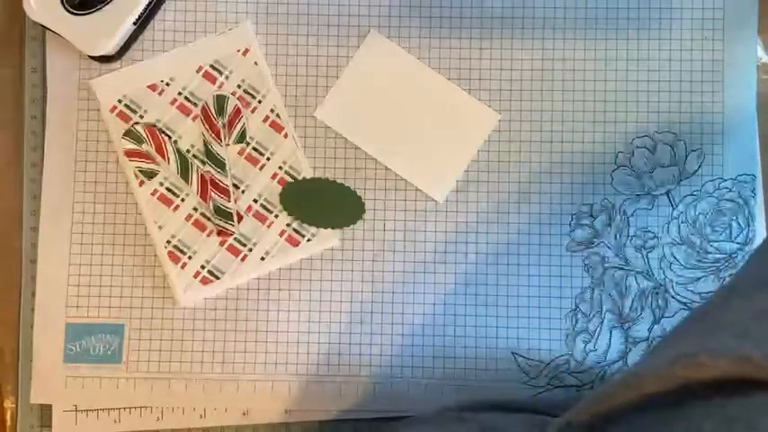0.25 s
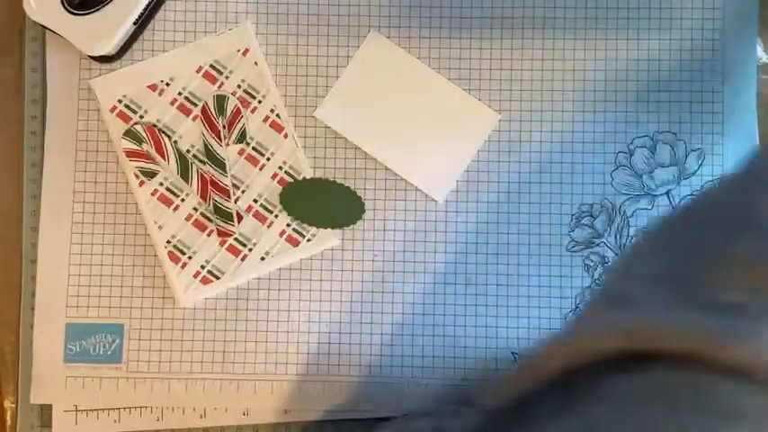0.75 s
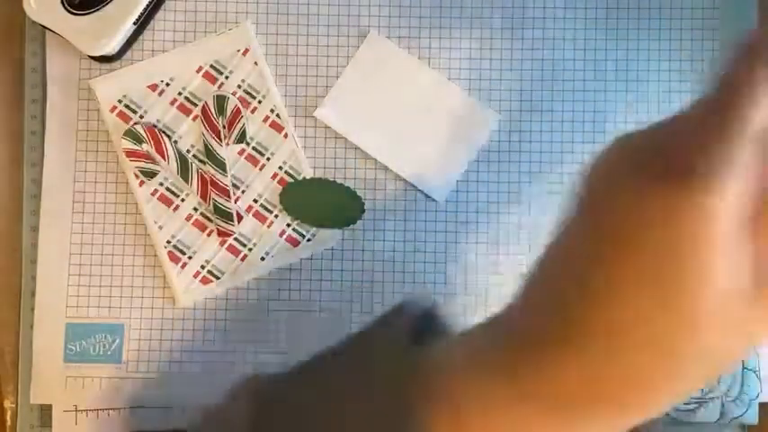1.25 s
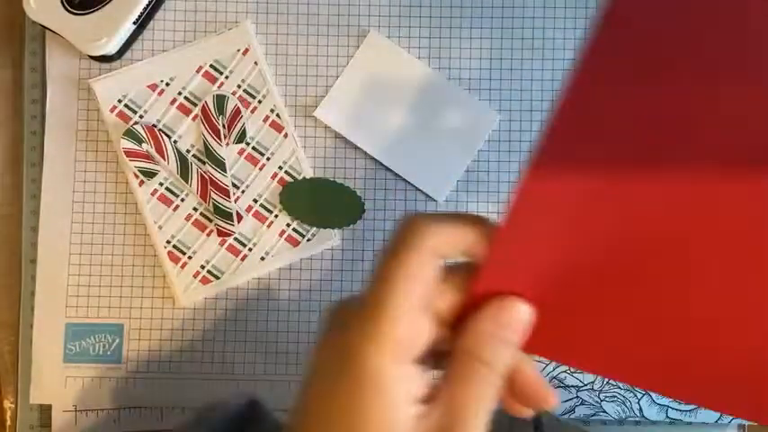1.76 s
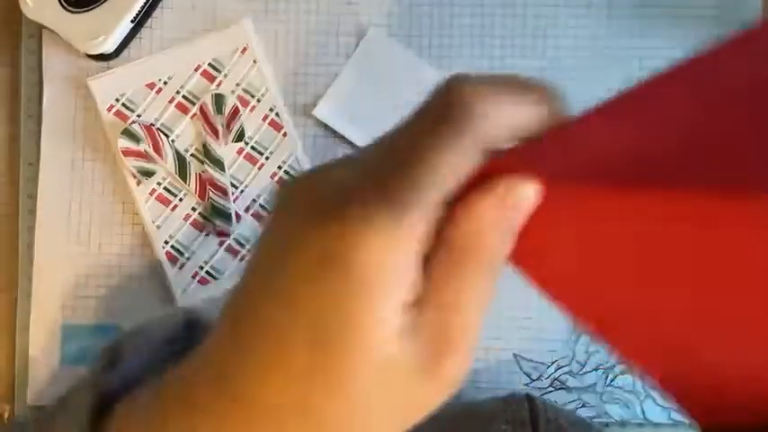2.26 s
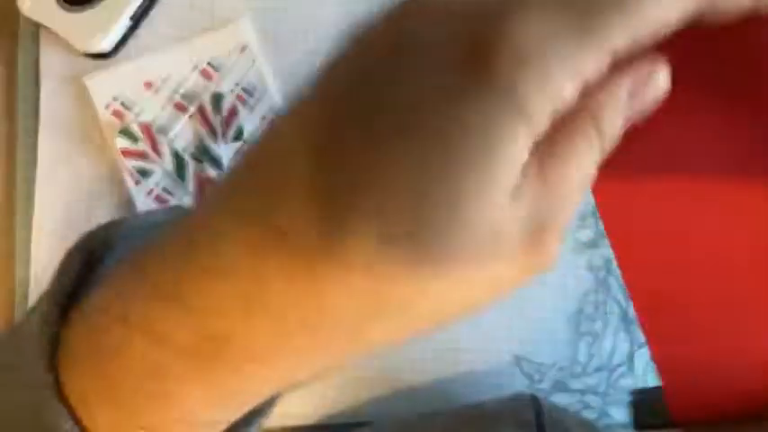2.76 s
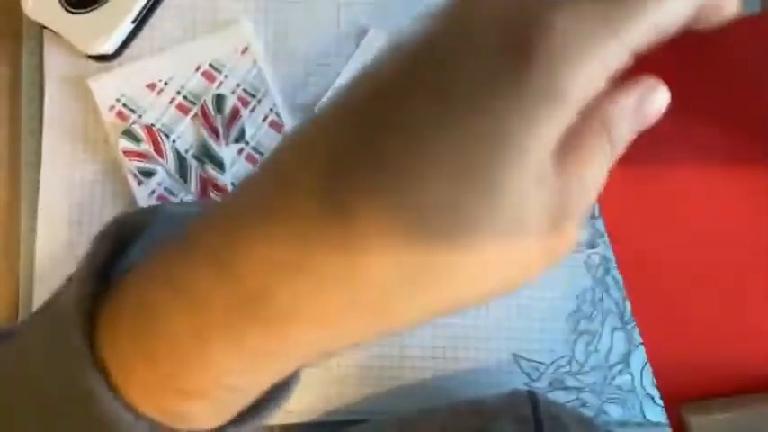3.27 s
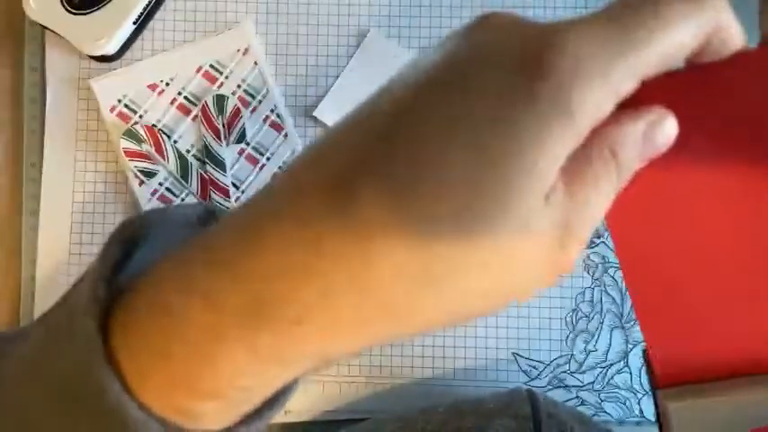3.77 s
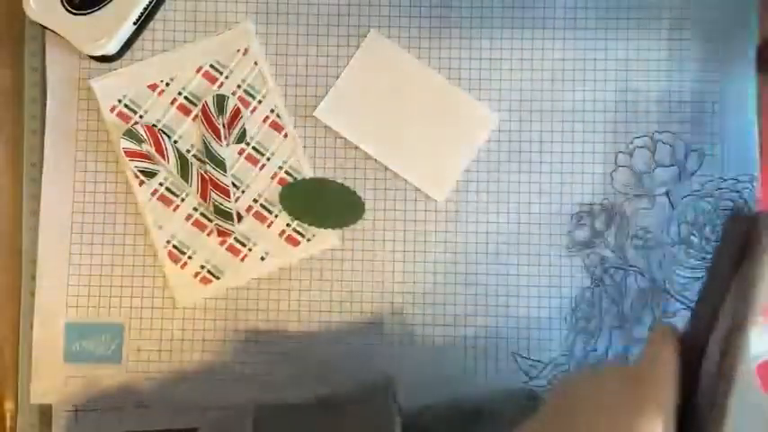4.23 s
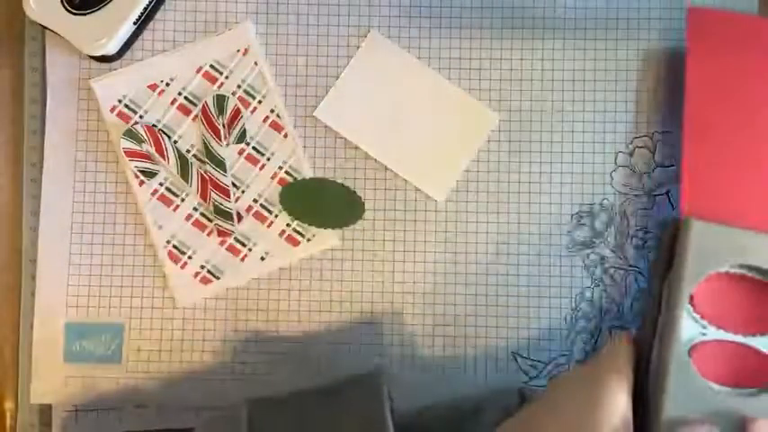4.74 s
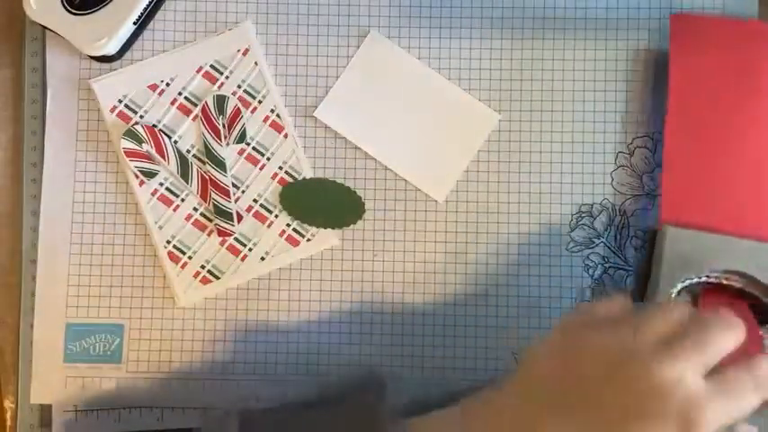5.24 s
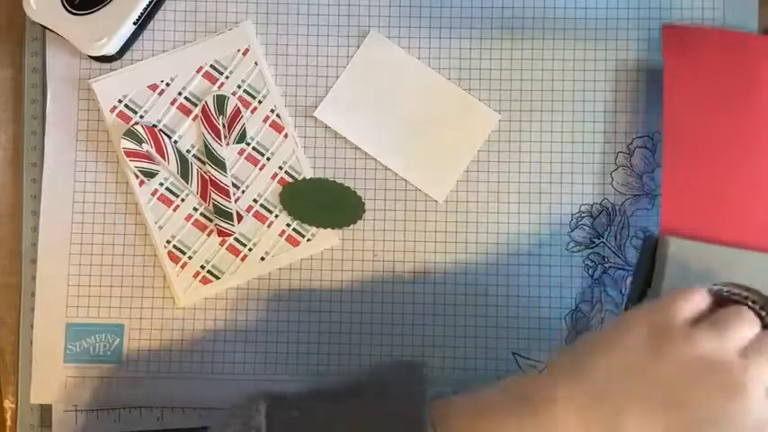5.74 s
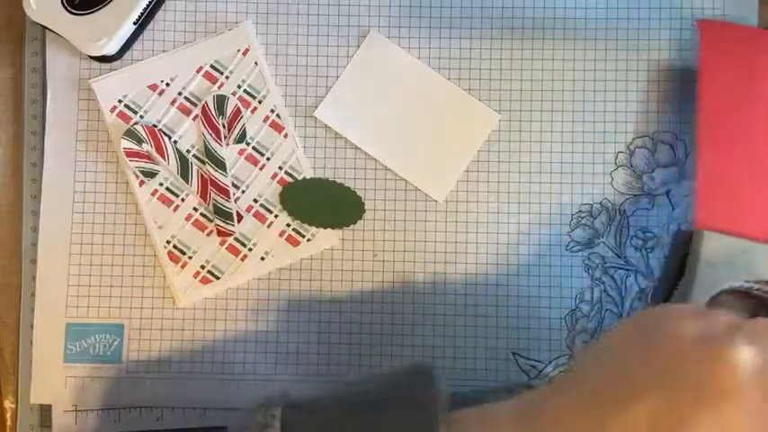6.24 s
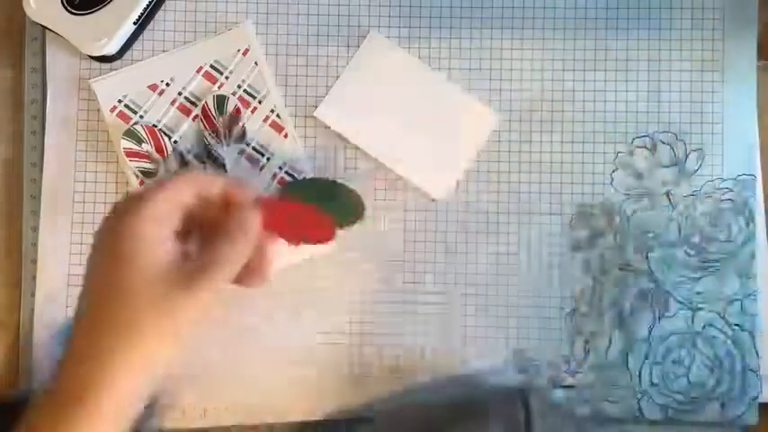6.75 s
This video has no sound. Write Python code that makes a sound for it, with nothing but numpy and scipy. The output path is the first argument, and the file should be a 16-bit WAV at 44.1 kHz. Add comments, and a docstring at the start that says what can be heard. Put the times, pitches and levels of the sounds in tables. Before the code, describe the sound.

Close up at a craft table, fingers slide a sheet of cardstock, which rubs, ticks and flaps with soft thuds on the tabletop. A little past halfway, a hand punch chatters and cuts through the card in a quick cluster of loud, sharp clacks. Quieter rustling and a few light metallic pings follow. The small room is quiet, with a faint hum.

```python
"""Close up at a craft table, in a small quiet room with a faint hum. Fingers slide cardstock over the mat:
its fibres rub and tick, and the bent sheet flaps and thuds on the table top. The card feeds into a hand
punch, singing against its lip. Past four seconds the lever chatters down and shears through in loud
clacks that ring the housing; the sound drops out for a moment between two of them. Then the cut shape
is picked out, with more rustling and light pings of the steel die."""
import sys
import numpy as np
from scipy import signal
from scipy.fft import rfft, irfft, next_fast_len
from scipy.io import wavfile
from scipy.ndimage import uniform_filter1d, map_coordinates

SR = 44100
rng = np.random.default_rng(int(sys.argv[2]) if len(sys.argv) > 2 else 0)


def to_wav(s):
    """Save 16-bit WAV."""
    ch = np.atleast_2d(s).T  # columns
    pcm = np.round(np.clip(ch, -1, 1) * 32767)  # PCM
    wavfile.write(sys.argv[1], SR, pcm.astype(np.int16))


N = 308700

# bright hiss of card fibres: (frequency [Hz], level [dB])
FIBRE_HISS = [(2940, -23.5), (5000, -3), (6020, -5.5), (7340, -6), (11600, -14.5), (16000, -22.5)]
# flaps of the whole sheet: (time [s], level [dB], first pitch [Hz], final pitch [Hz], t60 [s])
SHEET_FLAPS = [(.644, -47, 790, 599, 0.097), (.868, -41.5, 790, 699, .12), (1.47, -43, 444, 275, 0.1),
               (2.035, -44, 404, 237, 0.13), (2.288, -42, 910, 255, 0.069),
               (2.315, -37.5, 1190, 165.6, 0.16), (2.394, -34, 424, 154, 0.11), (2.553, -35, 626, 224, .08),
               (2.665, -39.5, 496, 195, 0.088), (2.879, -32.5, 820, 159, 0.23),
               (2.943, -28, 907, 399, 0.065), (2.962, -34.5, 302, 199, 0.074),
               (3.1235, -14.5, 1090, 197, 0.052), (3.145, -27, 580, 468, 0.055),
               (3.164, -21, 560, 420, .031), (3.874, -43, 690, 400, 0.093), (4.045, -35, 720, 416, 0.08),
               (4.061, -35.5, 705, 496, 0.092), (4.079, -31.5, 600, 433, 0.036),
               (4.134, -39, 450, 244, .063), (4.25, -44, 900, 625, 0.066), (4.269, -43.5, 495, 323, 0.024),
               (5.768, -41, 610, 476, 0.1), (6.154, -35.5, 591, 490, 0.063), (6.671, -44, 596, 490, 0.06)]


def amp(db):
    """Gain of a level in dB."""
    return 10 ** (np.asarray(db) / 20)


def unit(x):
    """x scaled to rms 1."""
    return x / np.sqrt(np.mean(x ** 2) + 1e-20)


def attack(t, rise_s):
    """A fade-in with time constant rise_s."""
    return 1 - np.exp(-t / rise_s)


def add_at(out, start_s, sound):
    """Mix a sound into out at its cue."""
    out[round(start_s * SR):][:len(sound)] += sound


def along(points, hz):
    """Interpolate (frequency, value) points on a log axis."""
    knots, values = np.transpose(points)
    return np.interp(np.log(hz + 1), np.log(knots + 1), values)


def wobble(rate):
    """A smooth random curve, rate knots a second."""
    knots = rng.standard_normal(int(N * rate / SR) + 4)
    return map_coordinates(knots, [np.arange(N) * rate / SR])


def response(f, peaks):
    """Summed (centre [Hz], width [Hz], level [dB]) resonances of alternating polarity."""
    return sum((-1) ** k * amp(db) * 1j * f * width / (hz * hz - f * f + 1j * f * width)
               for k, (hz, width, db) in enumerate(peaks))


def filtered(x, curve):
    """x through a complex gain curve over frequency."""
    size = next_fast_len(len(x) + 2048)
    return irfft(rfft(x, size) * curve(np.fft.rfftfreq(size, 1 / SR)), size)[:len(x)]


def coloured(x, spectrum):
    """x shaped by a spectrum, rms 1."""
    return unit(filtered(x, lambda hz: amp(along(spectrum, hz))))


def resonant(x, peaks):
    """x through resonances, rms 1."""
    return unit(filtered(x, lambda hz: response(hz, peaks)))


def gritty(grain_db, patchy_db):
    """Friction: noise that catches unevenly, in patches of shifting colour."""
    spectra = signal.stft(rng.standard_normal(N), nperseg=512)[2]
    patches = uniform_filter1d(rng.standard_normal(spectra.shape), size=4, axis=0)
    patches = uniform_filter1d(patches, size=5, axis=1)
    noise = signal.istft(spectra * amp(patchy_db * unit(patches)), nperseg=512)[1][:N]
    return noise * amp(grain_db * wobble(400))


def room_tone():
    """A bed of room air and a wavering hum."""
    # room air: (frequency [Hz], level [dB])
    air_spectrum = [(15, -39), (25, -22.5), (70, 8), (102, 3), (195, -10), (624, -8), (1260, -18.5),
                    (1740, -17), (1940, -24.5), (3340, -29.5), (4030, -30.5), (13600, -33.5), (16000, -52)]
    # low hum: (pitch [Hz], waver [Hz], rms level [dB])
    hum_tone = [(102.4, 4, -64)]
    air = amp(-62.5 + 0.86 * wobble(3.5)) * coloured(rng.standard_normal(N), air_spectrum)
    hz, waver_hz, db = hum_tone[0]
    phase = 2 * np.pi * np.cumsum(hz + waver_hz * wobble(7.1)) / SR
    return air + amp(db + 3 + 0.97 * wobble(6.1)) * np.sin(phase)


def sliding():
    """Fibres catch under each stroke; every new grip gives the sheet other narrow resonances."""
    # strokes of card and fingers: (start [s], length [s], mid level [dB], swell [dB], ringing [Hz])
    strokes = [(0, 0.028, -54.5, -14, 2100), (0.063, 0.053, -58.5, 3, 5100), (.138, 0.047, -51, -1, 2120),
               (0.185, 0.084, -51, -7, 3370), (0.316, 0.023, -49, -6, 1510),
               (0.354, 0.039, -51.5, -1, 2440), (0.507, 0.13, -62, -12, 2070),
               (0.632, 0.12, -56.5, -1, 3530), (0.747, 0.16, -57.5, -6, 613), (0.853, 0.1, -54, 1, 700),
               (1.2, 0.047, -58.5, 3, 900), (1.253, 0.046, -61, -1, 4940), (1.372, 0.077, -58, 9, 2870),
               (1.461, .11, -49, -8.5, 2120), (1.588, 0.033, -45, -28, 1920),
               (1.708, 0.034, -54, -16, 2160), (1.83, 0.13, -60, 3.5, 630), (2.006, 0.09, -51.5, 1.5, 2040),
               (2.132, 0.061, -48, 13.5, 2140), (2.194, 0.033, -48.5, -8, 4560),
               (2.233, 0.1, -55, 5.5, 2030), (2.381, 0.022, -47, -21, 1460),
               (2.441, 0.066, -42.5, -6, 1960), (2.543, 0.032, -59.5, -5, 4670),
               (2.661, 0.022, -63.5, -38, 4240), (2.75, 0.095, -49, 10.5, 2080),
               (2.847, 0.067, -57.5, -13, 935), (2.92, 0.066, -44, 1, 885), (2.983, 0.071, -44.5, -9, 1310),
               (3.059, 0.069, -44, 3, 557), (3.122, 0.057, -38.5, -2, 553), (3.188, .13, -44, -3.5, 1350),
               (3.35, 0.12, -54, -3, 1330), (3.484, 0.022, -45.5, -4, 2070), (3.873, 0.044, -63, -4, 1020),
               (3.953, 0.024, -68.5, -31, 1000), (4.043, 0.052, -46, -1.5, 2390),
               (4.124, 0.025, -64, 18.5, 2420), (4.25, 0.024, -52, -36, 880),
               (4.978, 0.042, -51.5, -12, 760), (5.089, 0.066, -63.5, 29, 1680),
               (5.346, 0.092, -64.5, 19, 940), (5.413, 0.065, -60, -15, 4230),
               (5.541, 0.028, -59.5, -2, 1374), (5.568, 0.054, -55, -8, 990), (5.762, 0.048, -59, -18, 556),
               (5.878, 0.082, -59.5, -11, 1717), (6.135, 0.06, -53.5, -9, 680),
               (6.486, 0.019, -48, -29, 900), (6.558, .03, -55.5, -21, 890), (6.601, 0.1, -60.5, 5, 2310),
               (6.712, 0.15, -64, 5, 2420), (6.875, 0.04, -59, -15, 1100), (6.963, 0.041, -36.5, -5, 930)]
    # restless hands: (time [s], rustle [dB], colour [Hz], flutter over rub [dB], hiss over rub [dB])
    handling = [(0, -60.5, 2280, -10, -13.5), (.2, -61, 3050, -21, -13), (.45, -57, 2340, -12.5, -12),
                (.9, -66.5, 1480, -3.5, -11), (1.1, -70.5, 1210, -8.5, -10), (1.35, -68.5, 1690, -1, -8),
                (1.5, -60.5, 2200, -7.5, -14), (1.75, -61.5, 1970, -1.5, -14.5), (1.98, -69, 1080, 3, -18),
                (2.1, -54.5, 2310, -5, -12), (2.26, -75.5, 2130, -12.5, -19.5), (2.4, -72, 1370, -5, -16),
                (2.5, -60, 1870, -9, -11), (2.7, -63.5, 1710, -7.5, -14.5), (3.1, -54, 1260, -6, -9),
                (3.3, -66, 1500, -12.5, -16.5), (3.55, -57, 1400, -3.5, -21), (3.8, -77, 1090, 6, -13),
                (4.3, -68.5, 1070, 2, -19.5), (4.92, -65, 1400, -11.5, -9), (5.3, -65.5, 1500, -16, -12.5),
                (5.649, -67.5, 1314, -12, -13), (5.85, -73.5, 1293, -10, -20), (6.1, -63.5, 1380, -10, -7),
                (6.3, -64, 1390, -7.5, -14.5), (6.42, -81.5, 1310, -12, -4.5),
                (6.602, -79, 1684, -9.5, -10), (7, -63, 1600, -13, -16.5)]
    # body of the sheet: (centre [Hz], width [Hz], level [dB])
    sheet_peaks = [(907, 470, -6.5), (1470, 370, -3.5), (1980, 700, -4), (3061, 1330, -0.5),
                   (3695, 1410, 1), (5080, 1800, -6.5)]
    # the punch lip sings as card slides past: (centre [Hz], width [Hz], level [dB])
    lip_peaks = [(4570, 80, 16), (2060, 110, 9)]
    # low flutter of the sheet: (frequency [Hz], level [dB])
    flutter_spectrum = [(59, -11), (100, -7.5), (157, 1.5), (211, -3.5), (482, -0.5), (900, -11.5),
                        (1170, -37.5), (1980, -120)]
    grip_s, release_t60_s, feed_start_s, feed_end_s = 0.17, 0.028, 1.63, 2.68
    ring_width_hz, ring_db, ring_pull = 90, 13, 0.3
    out = np.zeros(N + SR)
    fibres = gritty(grain_db=1.5, patchy_db=3.0)
    hiss = coloured(gritty(grain_db=1.5, patchy_db=1.0), FIBRE_HISS)
    flutter = coloured(rng.standard_normal(N), flutter_spectrum)
    stick_slip = amp(1.2 * wobble(45))
    times, *columns = np.transpose(handling)
    rustle_db, colour_hz, flutter_db, hiss_db = (np.interp(np.arange(N) / SR, times, c) for c in columns)
    rustle_db += 2.6 * wobble(14)
    # faint back-to-back strokes keep the card rustling throughout
    rustles = [(start, grip_s, None, 0, None) for start in np.arange(0, N / SR - .01, grip_s)]
    grips = rng.random((200, 10))
    for (start, length, db, swell_db, ring_hz), grip in zip(strokes + rustles, grips):
        span = slice(round(start * SR), min(N, round((start + length + .04) * SR)))
        hz = colour_hz[span].mean()
        hz *= ((ring_hz or hz) / hz) ** ring_pull  # the colour leans towards the ringing
        narrow = [(ring_hz or hz, ring_width_hz, ring_db if ring_hz else 3)]
        narrow += [(hz * 3.5 ** (2 * place - 1), ring_width_hz, 3) for place in grip]
        lip = lip_peaks if feed_start_s < start < feed_end_s else []

        def grip_colour(f):
            """The sheet's broad body with narrow resonances on top."""
            body = np.abs(response(f, sheet_peaks) * response(f, [(hz, 1.3 * hz, 0)]))
            return body * (1 + np.abs(response(f, narrow)) + np.abs(response(f, lip)))

        rub = unit(filtered(fibres[span], grip_colour))
        t = np.arange(len(rub)) / SR
        hold_db = rustle_db[span] if db is None else db + swell_db * (np.minimum(t / length, 1) - .5)
        release_db = -60 * np.maximum(t - length, 0) / release_t60_s
        envelope = amp(hold_db + release_db) * attack(t, 0.0047)
        friction = stick_slip[span] * (rub + amp(hiss_db[span]) * hiss[span])
        out[span] += envelope * (friction + amp(flutter_db[span]) * flutter[span])
    return out[:N]


def snaps():
    """Each tick is a sharp burst that rings briefly in the sheet, topped with a bright spit."""
    # card and finger ticks: (time [s], body peak [dB], pitch [Hz], spit over body peak [dB])
    ticks = [(0.069, -36.5, 2930, -21), (0.133, -40.5, 2150, -10), (0.216, -38, 3200, -27),
             (0.321, -52, 1530, -24), (0.36, -39, 1550, -24), (0.473, -44, 1840, -23),
             (0.584, -32, 3540, -18), (0.878, -33.5, 675, -15), (1.467, -42, 2230, -24),
             (1.59, -19.5, 2000, -24), (1.664, -36.5, 1860, -38), (1.702, -39, 2130, -18),
             (1.785, -43.5, 2050, -25), (2.012, -41, 2040, -14), (2.083, -27.5, 1880, -34),
             (2.185, -36.5, 2200, -29), (2.289, -37, 1270, -36), (2.317, -36.5, 920, -21),
             (2.384, -41, 925, -22), (2.449, -18.5, 1880, -22.5), (2.554, -40, 1240, -27),
             (2.663, -39.5, 1890, -26), (2.865, -30, 1020, -30), (2.927, -33, 867, -34),
             (2.943, -28, 1200, -33), (3.145, -19.5, 1350, -20), (3.552, -43, 1210, -40),
             (3.875, -46, 1050, -15), (3.893, -46, 980, -19), (4.046, -31.5, 1540, -26),
             (4.061, -28, 2360, -19), (4.079, -36.5, 2400, -29), (4.086, -34, 1150, -28),
             (4.143, -46, 802, -18), (4.251, -36.5, 870, -11), (4.305, -44.5, 730, -24),
             (4.329, -48.5, 935, -20), (4.974, -39, 950, -5), (4.982, -36, 1417, -9),
             (5.055, -44, 880, -5.5), (5.408, -37.5, 1320, -31.5), (5.457, -41, 1620, -17),
             (5.89, -36, 1740, -24), (6.125, -54, 720, -1), (6.14, -44, 718, -14), (6.677, -42, 926, -15.5),
             (6.844, -43, 960, -29), (6.885, -41.5, 1320, -8), (6.968, -28.5, 1036, -26)]
    spit_t60_s = 0.036
    out, t = np.zeros(N + SR), np.arange(SR // 12) / SR
    hiss = coloured(rng.standard_normal(N + SR), FIBRE_HISS)
    fade = amp(-60 * t / spit_t60_s)
    for start, db, hz, spit_db in ticks:
        burst = rng.standard_normal(len(t))
        burst[0] = 6  # the first break of the fibres
        body = resonant(burst * fade ** 2, [(hz, 0.14 * hz, 0), (2.1 * hz, 0.24 * hz, -9)])
        spit = amp(spit_db) * hiss[round(start * SR):][:len(t)] * fade * attack(t, .0005)
        add_at(out, start, amp(db) * (body / np.abs(body).max() + spit))
    return out[:N]


def flaps():
    """The bent sheet relaxes, so its low note drops quickly and wobbles as it dies."""
    sag_s = .004
    out, t = np.zeros(N + SR), np.arange(SR // 5) / SR
    uneven = wobble(120)
    for start, db, first_hz, final_hz, t60 in SHEET_FLAPS:
        hz = final_hz + (first_hz - final_hz) * np.exp(-t / sag_s)
        hz *= 1 + 0.075 * uneven[:len(t)] * rng.choice([-1, 1])
        note = np.sin(2 * np.pi * np.cumsum(hz) / SR)
        add_at(out, start, amp(db - 60 * t / t60) * note * attack(t, 0.0011))
    return out[:N] * amp(3.9 * uneven)


def table_thuds():
    """Every flap pushes the table top, which answers with a low thud."""
    # table top modes: (pitch [Hz], level relative to the flap [dB], t60 [s])
    top_modes = [(71, -21, .09), (151, -12, .07)]
    pushes, t = np.zeros(N), np.arange(SR // 4) / SR
    for start, db, *_ in SHEET_FLAPS:
        pushes[round(start * SR)] = amp(db)
    thud = sum(amp(db - 60 * t / t60) * np.sin(2 * np.pi * hz * t) for hz, db, t60 in top_modes)
    return signal.fftconvolve(pushes, thud)[:N]


def lever_chatter():
    """Loose parts chatter while the lever travels."""
    # chatter along the lever's travel: (time [s], level [dB])
    travel = [(4.366, -53), (4.497, -48.5), (4.609, -46.5), (4.679, -37), (4.805, -50.5), (4.93, -63)]
    # resonances of the loose parts: (centre [Hz], width [Hz], level [dB])
    lever_peaks = [(950, 180, -0.5), (1300, 190, -3), (2100, 860, -14.5), (4200, 1900, -19.5)]
    times, db = np.transpose(travel)
    envelope = amp(np.interp(np.arange(N) / SR, times, db, left=-150, right=-150))
    return envelope * resonant(gritty(grain_db=3, patchy_db=1), lever_peaks)


def punch_clacks():
    """Each contact shears for a few ms, cracks, and rings the housing most near its favoured pitch."""
    # contacts inside the punch: (time [s], level [dB], favoured pitch [Hz], shear t60 [s])
    contacts = [(4.3875, -10, 1270, 0.0058), (4.3925, -3, 700, 0.0034), (4.4, -15, 922, 0.0037),
                (4.4098, -8.5, 1090, 0.0069), (4.4467, -23.5, 1070, .007), (4.4855, -22, 1120, 0.018),
                (4.502, -10, 980, 0.011), (4.5052, -7, 770, 0.0088), (4.5083, -6.5, 696, 0.002),
                (4.514, -18.5, 765, 0.0091), (4.525, -17, 850, 0.0051), (4.6184, -20, 1310, 0.0028),
                (4.6208, -12, 1240, 0.0033), (4.7113, -17, 1340, 0.0039), (4.73, -27, 1260, .004),
                (4.753, -25, 990, 0.0056), (4.8052, -25, 1198, 0.0038), (4.8102, -13.5, 1290, 0.0074),
                (4.8146, -3, 1089, 0.002), (4.8177, 0, 1700, 0.0018), (4.8211, -9.5, 2020, 0.0041),
                (4.8231, -2, 930, 0.0028), (4.8266, -1, 930, 0.012), (4.8305, -8.5, 935, 0.0048),
                (4.838, -20.5, 925, 0.0046), (4.846, -24.5, 935, 0.0028), (4.862, -24.5, 1907, .004)]
    # punch housing modes: (pitch [Hz], level [dB], t60 [s])
    housing_modes = [(177, -19.5, .03), (388, -11, .02), (546.3, -6.5, 0.0087), (718, -3.5, 0.013),
                     (790, -4, 0.01), (920, -0.5, 0.013), (1027, -4.5, 0.009), (1155, -3.5, 0.014),
                     (1440, -6.5, 0.0075), (1591, -4.5, 0.0096), (1790, -4.5, 0.008), (2205, 0, 0.01),
                     (2288, -1, .012), (2416, -7, 0.016)]
    falloff_db_per_octave, low_cut_hz = 13, 230  # too small a body to radiate bass
    out, t = np.zeros(N + SR), np.arange(SR // 8) / SR
    for start, db, favoured_hz, shear_t60 in contacts:
        scatter_db = rng.normal(0, 2, len(housing_modes))
        shear_noise, crack_noise = rng.standard_normal((2, len(t)))
        ring = np.zeros(len(t))
        for k, (hz, mode_db, t60) in enumerate(housing_modes):
            struck_db = mode_db + scatter_db[k] - falloff_db_per_octave * abs(np.log2(hz / favoured_hz))
            ring += (-1) ** k * amp(struck_db - 60 * t / t60) * np.sin(2 * np.pi * hz * t)
        shear = shear_noise * attack(t, 0.00025) * amp(-60 * t / shear_t60)
        knock = signal.fftconvolve(shear, ring)[:len(t)]
        crack_fade = amp(-19 - 60 * t / 0.019) + amp(-18.5 - 60 * t / 0.085)  # fast bite, longer tail
        # bright crack of a contact: (frequency [Hz], level [dB])
        crack_spectrum = [(820, -31.5), (1400, -1), (2210, -9), (3160, -12.5), (3920, -7.5), (4570, -8),
                          (5320, -14.5), (7150, -17), (9320, -17.5), (16000, -31.5)]
        crack = coloured(crack_noise, crack_spectrum) * crack_fade * attack(t, 0.00019)
        add_at(out, start, amp(db) * (knock / np.abs(knock).max() + crack))
    return filtered(out[:N], lambda hz: (1j * hz / (low_cut_hz + 1j * hz)) ** 2)


def die_pings():
    """Light touches ping the steel die; the softer the touch, the more one pitch stands alone."""
    # touches on the die: (time [s], level [dB], favoured pitch [Hz])
    touches = [(5.102, -50, 2780), (5.134, -42.5, 4000), (5.151, -46, 1728), (5.182, -49, 1728),
               (5.211, -53, 1733), (5.252, -49.5, 1728), (5.285, -51, 1728), (6.487, -38.5, 1670),
               (6.539, -50, 1728), (6.561, -43.5, 1090), (6.611, -40.5, 2245), (6.644, -60, 1100),
               (6.674, -54.5, 1100)]
    # steel die modes: (pitch [Hz], t60 [s])
    die_modes = [(912, .15), (1728, .06), (2245, .09), (3225, .04), (3900, .05)]
    broad_db = -30  # a touch this hard would ring all modes alike
    out, t = np.zeros(N + SR), np.arange(SR // 4) / SR
    for start, db, favoured_hz in touches:
        falloff_db_per_octave = 1.6 * max(broad_db - db, 0)
        for hz, t60 in die_modes:
            struck_db = db - falloff_db_per_octave * abs(np.log2(hz / favoured_hz))
            ring = amp(struck_db - 60 * t / t60) * np.sin(2 * np.pi * hz * t)
            add_at(out, start, ring * attack(t, 0.00035))
    return out[:N]


def reverb(x):
    """The walls answer, each frequency dying at its own speed; a fresh tail every fifth of a second."""
    # decay of the small room: (frequency [Hz], t60 [s])
    room_decay = [(200, 0.4), (1000, 0.14), (4000, 0.12), (12000, 0.16)]
    hop, predelay_samples = SR // 5, 200
    out = np.zeros(N + SR)
    for i in range(0, N, hop):
        hz, t, spectra = signal.stft(rng.standard_normal(SR // 3), SR, nperseg=256)
        fade = amp(-60 * t / along(room_decay, hz)[:, None])
        tail = signal.istft(spectra * fade, SR, nperseg=256)[1]
        wet = signal.fftconvolve(x[i:i + hop], tail / np.linalg.norm(tail))
        out[i + predelay_samples:][:len(wet)] += wet
    return out[:N]


def scene():
    """The mono mix: card and punch up front, with the punch kept drier, over the room tone."""
    touches = snaps() + flaps() + die_pings()
    clacks = punch_clacks() + lever_chatter()
    rubbing = sliding()
    wet = reverb(amp(-9.0) * (touches + rubbing) + amp(-17.5) * clacks)
    return (rubbing + touches + clacks + wet + table_thuds() + room_tone())[None]


def record(dry):
    """Loud peaks round off; the sound drops out briefly, treble first; deep bass and very top are cut."""
    ceiling, treble_gap_s, body_gap_s = .95, (4.597, 4.677), (4.631, 4.710)
    low_cut_hz, split_hz, top_hz, edge_hz = 45, 10200, 16100, 300
    t = np.arange(N) / SR

    def mute(start, end):
        """A gate that closes over a span, with 1.5 ms fades."""
        return uniform_filter1d(((t < start) | (t > end)) * 1., size=66)

    def band(hz):
        """A steep top edge and a gentle low cut."""
        return np.clip((top_hz - hz) / edge_hz, 0, 1) * (1j * hz / (low_cut_hz + 1j * hz)) ** 2

    rounded = dry[0] / (1 + np.abs(dry[0] / ceiling) ** 4) ** .25
    treble = filtered(rounded, lambda hz: 1 / (1 + (split_hz / (hz + 1)) ** 40))
    gated = (rounded - treble) * mute(*body_gap_s) + treble * mute(*treble_gap_s)
    return filtered(gated, band)[None]


dry = scene()
out = record(dry)
to_wav(out)
```